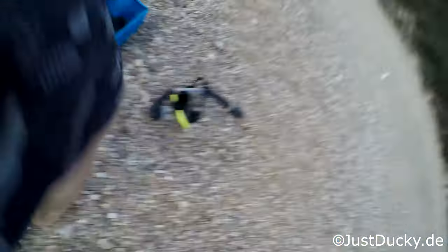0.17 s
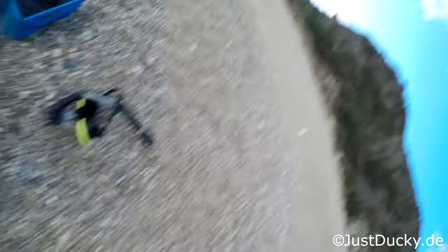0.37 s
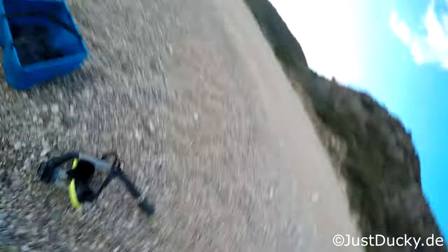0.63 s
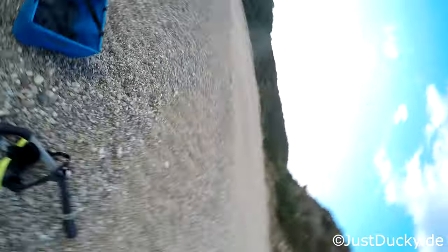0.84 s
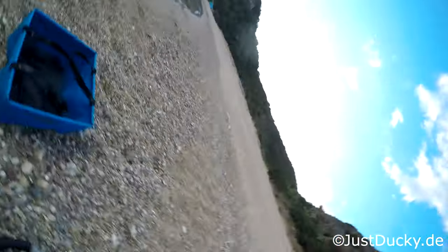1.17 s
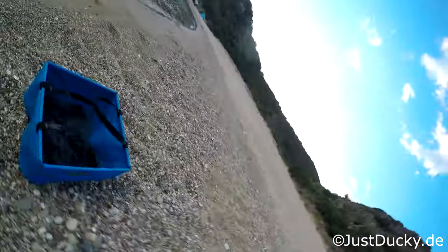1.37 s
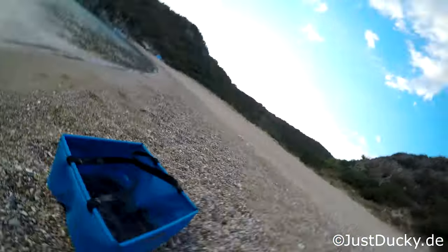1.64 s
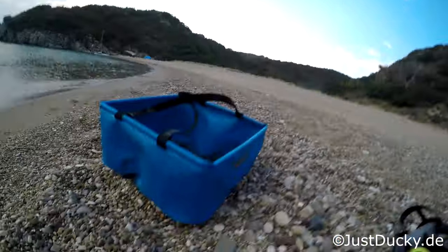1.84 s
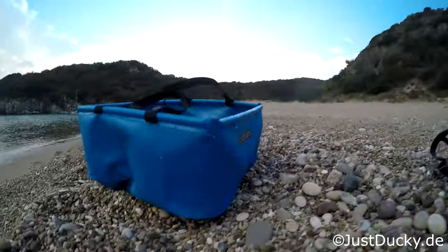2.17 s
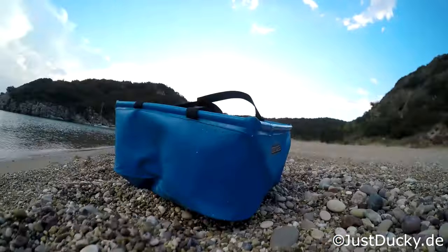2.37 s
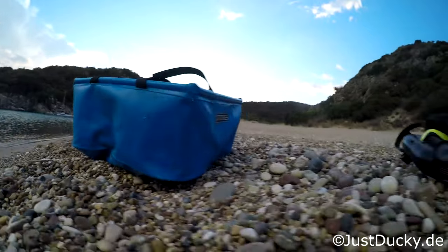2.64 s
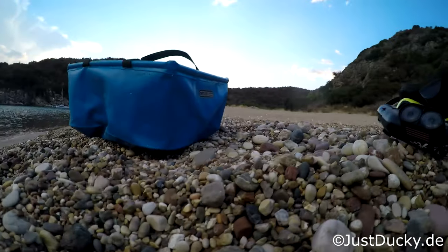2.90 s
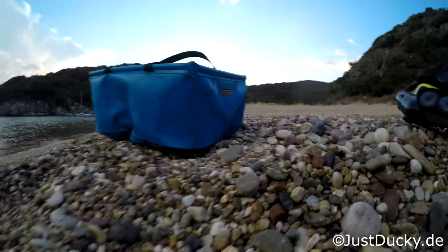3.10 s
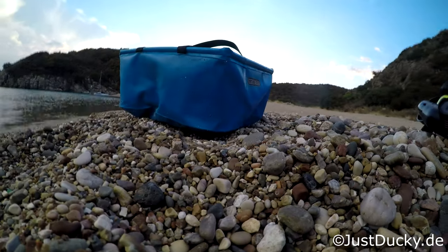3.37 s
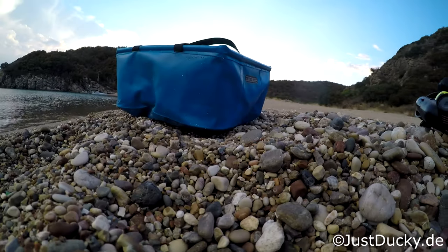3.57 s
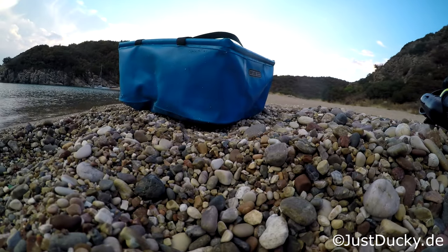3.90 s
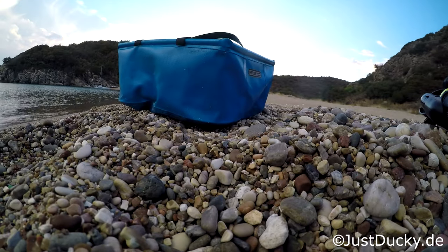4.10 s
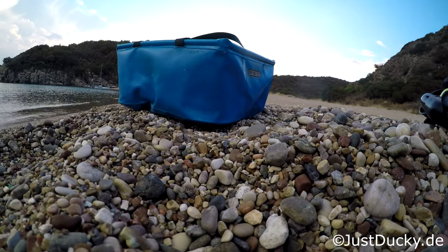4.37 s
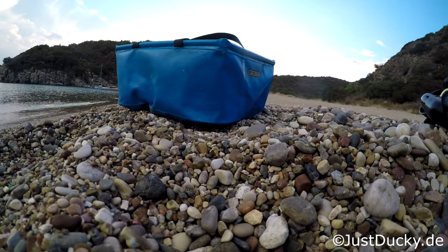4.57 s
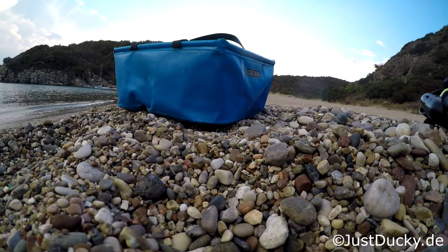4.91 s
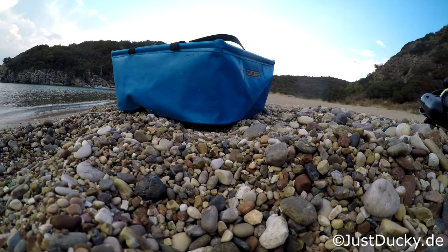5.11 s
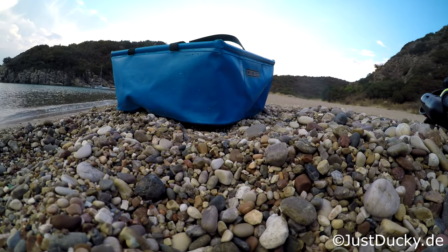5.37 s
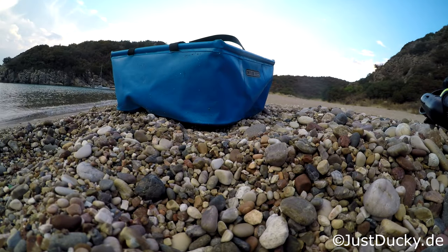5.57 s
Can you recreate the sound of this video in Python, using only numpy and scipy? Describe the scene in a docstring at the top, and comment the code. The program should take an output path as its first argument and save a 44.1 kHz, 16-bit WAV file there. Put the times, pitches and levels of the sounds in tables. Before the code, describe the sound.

A hand rubs and bumps a carried pole, then a plastic case crunches loudly into beach pebbles and settles to near silence with faint dull lapping.

```python
"""Pebbles knock and grind against a waterproof plastic case pushed into a beach, in a few shoves that settle.
Stone sounds are clumps of tiny ringing contacts, three-mode clacks and single damped knocks.
Before that the case is swung on a pole: skin friction is stick-slip grains, the pole a wavering low tone.
At rest, small waves lap dully: dense bubble grains over a noise boom. Thin hiss and quiet noise lie behind.
"""
import sys
import numpy as np
from scipy import signal
from scipy.fft import rfft, irfft, next_fast_len
from scipy.io import wavfile
from scipy.ndimage import uniform_filter1d

SR = 44100
rng = np.random.default_rng(int(sys.argv[2]) if len(sys.argv) > 2 else 0)


def materialize(psi):
    """Save the field psi as 16-bit PCM at rate SR to the path in sys.argv[1].

    A 1-D psi becomes a single channel; in a 2-D psi each row is a channel.
    """
    bounded = np.clip(np.atleast_2d(psi).T, -1, 1)
    quanta = np.round(bounded * 32767).astype(np.int16)
    wavfile.write(sys.argv[1], SR, quanta)


N = 253134  # samples

# shoves through the pebbles, then rocking and settling: start_s, hold_s, force_db, sharp_edges_re_force_db
SHOVES = [(2.454, 0.022, -31.5, -36), (2.505, 0.062, -16, -44), (2.583, 0.13, -15.5, -38),
          (2.743, 0.11, -15.5, -38), (2.876, 0.019, -14.5, -22), (2.907, 0.075, -24, -32),
          (2.98, 0.042, -22.5, -27), (3.03, 0.063, -30.5, -32), (3.106, 0.035, -21, -38),
          (3.145, 0.02, -14, -22), (3.189, .012, -14.5, -21), (3.208, 0.009, -21, -30),
          (3.254, 0.025, -21, -23), (3.287, 0.073, -33.5, -28), (3.395, 0.022, -25, -38),
          (3.461, 0.11, -47, -27), (3.54, 0.096, -48.5, -34), (3.67, 0.082, -41, -33),
          (3.704, 0.017, -34, -30), (3.797, 0.1, -60, -25), (3.97, .06, -74, -15), (4.144, 0.017, -53, -34),
          (4.235, 0.014, -53.5, -28), (4.345, 0.033, -57, -25), (4.396, 0.012, -51.5, -32),
          (4.474, 0.063, -47.5, -27), (4.564, 0.054, -58, -8)]
# spectrum of grinding stones: freq_hz, shape_db
CRUNCH_SPECTRUM = [(120, 19.5), (200, 9), (330, 0.5), (550, 1.5), (800, 3.5), (1100, 3.5), (1450, -2.5),
                   (2200, 2.5), (3000, -6), (3600, -16), (5200, -19), (6800, -28.5), (8500, -30),
                   (10300, -50), (12300, -35.5), (14000, -52.5), (16000, -58.5)]
# spectrum of the sharpest edges: freq_hz, shape_db
SPARKLE_SPECTRUM = [(6000, 7.5), (9000, -2.5), (10300, -11), (13000, -14.5), (16000, -32.5)]
# bass taken up as the case digs in: time_s, gain_db
BEDDING = [(2.75, -3), (3.2, 5)]
SHOVE_RISE_S, SHOVE_FALL_S = .04, 0.042   # per 20 dB
FULL_FORCE_DB, CRUNCH_DB = -14.5, -.5
WEIGHT_DB, WEIGHT_EXPONENT = -11.5, 0.8   # bass at full force; shrinks more slowly than the force
GRIT_DB, GRIT_EXPONENT = -11, 1.31   # treble at full force; shrinks faster
ZING_HZ, ZING_WIDTH_HZ, ZING_DB = 12300, 2100, -38.5   # thin ring of scratching edges, at full force
CLACK_SHARE, CLACKS_PER_S, CLACK_T60_AT_2KHZ_S = 0.54, 380, .024


def pebbles(force, load):
    """Gravel grinds and stones clack along the case: gritty when shoved hard, dull when it only rocks."""
    gravel = grains(per_s=2600, spread_db=3.0, clump_db=3, sharpness=7.4, tick=0.35)
    contacts = gravel + CLACK_SHARE * clacks(CLACKS_PER_S, CLACK_T60_AT_2KHZ_S)
    weight, crunch, grit = bands(case(colour(contacts, CRUNCH_SPECTRUM)), [125, 400, 3400, 7000])

    # few, sharp edges reach the top of the treble
    edges = grains(per_s=860, spread_db=6.0, clump_db=6.5, sharpness=10, tick=.5)
    scratches = edges + .5 * gravel
    sparkle, = bands(colour(scratches, SPARKLE_SPECTRUM), [7000, 16000])
    zing = resonate(resonate(scratches, ZING_HZ, ZING_WIDTH_HZ), ZING_HZ, ZING_WIDTH_HZ)
    zing = steady(zing, span_s=.05)

    sharp_rows = [(s, hold, db + edge_db) for s, hold, db, edge_db in SHOVES]
    treble = follow(force, GRIT_DB, GRIT_EXPONENT) * grit
    treble += follow(force, ZING_DB, GRIT_EXPONENT) * zing
    treble += strokes(sharp_rows, SHOVE_RISE_S, SHOVE_FALL_S) * sparkle
    bedding_db, = in_time(BEDDING)
    bass = load * from_db(bedding_db) * weight
    return from_db(CRUNCH_DB) * force * crunch + bass + treble


def follow(force, db, exponent):
    """A level that is db against the force at full force and goes with a power of it."""
    full = from_db(FULL_FORCE_DB)
    return full * from_db(db) * (force / full) ** exponent


CLACK_SPREAD_DB = 11   # most clacks are light, a few hard


def clacks(per_s, t60_at_2khz_s):
    """Larger stones clack at uneven gaps, each with three modes of its own; high modes die sooner."""
    start = SHOVES[0][0]
    end = SHOVES[-1][0] + SHOVES[-1][1]
    span = end - start
    out, t = np.zeros(N), np.arange(1500) / SR
    for when, size, *modes in rng.random((int(per_s * span), 5)):
        hz = 600 * 12 ** np.array(modes)[:, None]  # 600 to 7200 Hz
        decay = from_db(-60 * t / t60_at_2khz_s * np.sqrt(hz / 2000))
        ring = np.sqrt(hz) * np.sin(2 * np.pi * hz * t) * decay
        at = int((start + when * span) * SR)
        out[at:at + len(t)] += from_db(CLACK_SPREAD_DB * size ** 2) * ring.sum(axis=0)
    return rms_one(out) * np.sqrt(span * SR / N)  # unit power within the span


def grains(per_s, spread_db, clump_db, sharpness, tick):
    """Clumps of tiny contacts: each is a tick plus a brief ring at a pitch from a set of 22."""
    born = rng.random(N) < per_s * from_db(clump_db * drift(45)) / SR
    sizes = from_db(spread_db * np.minimum(rng.exponential(1, N), 4))
    clicks = born * sizes * rng.choice([-1, 1], N)
    pitches_hz = np.geomspace(400, 12000, 22)
    dealt = rng.integers(0, len(pitches_hz), N)
    rings = sum(resonate(clicks * (dealt == k), hz, hz / sharpness) for k, hz in enumerate(pitches_hz))
    return rms_one(rings + tick * clicks)


# hand and stones on the case: time_s, peak_db, pitch_hz, lowpass_hz (hardness), chatter_t60_s
KNOCKS = [(.242, -20, 2400, 6500, .02), (0.503, -21.5, 970, 4040, 0.016), (.633, -20, 1780, 3130, 0.021),
          (0.805, -17.5, 790, 7000, 0.021), (1.472, -12, 860, 2140, 0.089),
          (1.483, -16.5, 786, 1960, 0.064), (1.7738, -12, 1120, 2200, 0.034),
          (1.794, -20.5, 1200, 2800, .03), (1.808, -19.5, 1090, 3000, 0.032),
          (1.813, -13.5, 1080, 1800, 0.026), (1.842, -8.5, 1110, 3100, 0.05),
          (1.859, -6.5, 1100, 3000, 0.038), (1.8671, -1.5, 2200, 2700, 0.016),
          (1.982, -18, 2130, 3500, 0.066), (2.260, -40, 980, 3000, 0.034), (2.364, -30.5, 2996, 5000, .018),
          (2.428, -19.5, 2930, 3950, 0.013), (2.482, 8, 3100, 14000, 0.012),
          (2.484, -4.5, 1250, 3000, 0.06), (2.499, -2, 2300, 5444, 0.014), (2.505, -2.5, 2240, 5500, 0.014),
          (2.525, -6, 2480, 7000, .006), (2.549, -9, 1060, 5950, 0.015), (2.604, 1.5, 2100, 7060, 0.015),
          (2.71, -15, 3200, 4000, 0.019), (2.873, -2, 5000, 7980, 0.005), (2.880, 1.5, 1640, 2900, .025),
          (3.15, -11.5, 910, 7020, 0.025), (3.178, -1, 2030, 3610, .024), (3.182, 2, 2450, 4530, 0.014),
          (3.194, -11, 890, 7000, 0.013), (3.214, -8.5, 820, 5000, .018), (3.649, -31.5, 595, 2500, .025),
          (3.709, -25, 2206, 8000, 0.025), (3.764, -34, 2396, 5000, 0.012),
          (3.844, -41.5, 2400, 7000, 0.025), (3.965, -44, 500, 2960, 0.026), (4.043, -52, 400, 2500, .02),
          (4.077, -49, 2202, 2980, .02), (4.156, -41, 2300, 2800, 0.027), (4.161, -31.5, 600, 2380, 0.017),
          (4.246, -44.5, 900, 3000, .02), (4.346, -38, 1085, 2550, 0.071), (4.408, -33, 900, 1820, 0.028),
          (4.485, -35, 1200, 5000, 0.015), (4.551, -41, 2300, 4030, 0.014), (4.603, -39, 2310, 4500, 0.017),
          (5.134, -28, 3500, 7940, 0.013)]
# spectrum of a sharp blow: freq_hz, shape_db
BLOW_SPECTRUM = [(120, -29), (300, -11.5), (450, -3.5), (900, 8.5), (3000, 1.5), (5500, 3), (8000, -11),
                 (15000, -20.5)]
KNOCK_CHATTER = .36   # rattle after the first contact, as a share of it


def knocks():
    """A contact cracks, chatters for a moment and rings at its own pitch; soft ones lack treble."""
    out, t = np.zeros(N), np.arange(4096) / SR
    chatter = rng.standard_normal((len(KNOCKS), len(t)))
    for (s, peak_db, hz, top_hz, t60), rough in zip(KNOCKS, chatter):
        force = KNOCK_CHATTER * rough * from_db(-60 * t / max(t60, .002))
        force[0] += 1  # first contact
        softening = signal.butter(3, min(top_hz, .45 * SR), fs=SR, output="sos")
        force = signal.sosfilt(softening, force)
        hit = case(colour(resonate(force, hz, hz * 0.36) + 0.38 * force, BLOW_SPECTRUM))
        hit *= from_db(peak_db) / np.abs(hit).max()
        at = int(s * SR)
        out[at:at + len(t)] += hit[:N - at]
    return out


# case resonances: freq_hz, width_hz, lift_db
CASE_MODES = [(507, 70, 2.5), (827, 140, 5.5), (972, 26, 5), (2293, 210, 5.5), (3040, 81, 7), (4090, 75, 5),
              (5000, 490, 4.5), (9000, 1500, -7.5)]


def case(x):
    """The plastic case rings with whatever touches it."""
    return x + sum((from_db(db) - 1) * resonate(x, hz, width) for hz, width, db in CASE_MODES)


# spectrum of hand friction: freq_hz, shape_db
RUB_SPECTRUM = [(170, -12.5), (230, 8.5), (320, -10.5), (450, 1), (600, -7.5), (800, 0), (1000, 1),
                (1400, -6.5), (1800, -1), (2300, -2), (3000, -7), (3600, -19), (5000, -25.5), (7000, -39),
                (9000, -43.5)]
PALM_DB, SKIN_DB, SCRAPE_DB = -1.5, -3.5, -4   # low, middle and high part of the friction


def grip(rubbing, rasping, pressing):
    """Skin and strap stick and slip on the pole in fine, dense jerks."""
    slips = grains(per_s=4000, spread_db=-1.5, clump_db=3, sharpness=8.3, tick=0.27)
    palm, skin, scrape = bands(case(colour(slips, RUB_SPECTRUM)), [190, 650, 1500, 9000])
    out = pressing * from_db(PALM_DB) * palm
    out += rubbing * from_db(SKIN_DB) * skin
    return out + rasping * from_db(SCRAPE_DB) * scrape


# hand shifts on the pole, before part levels: start_s, hold_s, rub_db, palm_press_db, rasp_re_rub_db
RUBS = [(0, .14, -37.5, -51.5, 3.5), (0.167, 0.044, -52, -46, 10), (0.393, .04, -40, -54, -2.5),
        (0.447, 0.044, -35, -46.5, 4), (.503, 0.014, -34, -34, 5.5), (0.635, 0.04, -22, -34.5, 0),
        (0.685, 0.046, -19, -35, 0), (0.754, 0.038, -28, -46, -2), (0.795, 0.024, -27.5, -31, 5.5),
        (0.832, 0.06, -35, -41.5, 3.5), (0.899, 0.076, -32, -34.5, 2.5), (0.993, .055, -41.5, -35.5, 2),
        (1.094, 0.12, -60, -42.5, -3), (1.431, .04, -35.5, -59, -3), (1.463, 0.036, -29, -30.5, -4.5),
        (1.551, 0.022, -34, -53, 0.5), (1.697, 0.18, -34, -39.5, -6), (1.881, 0.046, -40.5, -50, 6),
        (1.975, 0.046, -33, -51, 0.5), (2.025, 0.061, -39, -57, 2), (2.097, 0.091, -47.5, -59, -5),
        (2.265, 0.021, -38.5, -51, -2), (2.417, 0.0099, -50, -58, 6)]
RUB_RISE_S, RUB_FALL_S = .022, 0.023   # per 20 dB
HOLD_RUB_DB, HOLD_PALM_DB = -49, -56.5   # the hand creeps while it carries the pole
TOUCHDOWN_S, AT_REST_S = 2.45, 3.5   # the case meets the stones; it stops ploughing


def hand_effort():
    """How hard the hand rubs, rasps and presses, as three envelopes."""
    creep = (0, TOUCHDOWN_S, HOLD_RUB_DB, HOLD_PALM_DB, 0.0026)
    s, hold, rub_db, press_db, rasp_db = np.transpose(RUBS + [creep])
    levels = (rub_db, rub_db + rasp_db, press_db)
    return [strokes(zip(s, hold, db), RUB_RISE_S, RUB_FALL_S) for db in levels]


# grip squeaks: time_s, peak_db, pitch_hz, half_width_s (to 1/e)
SQUEAKS = [(1.881, -26.5, 2100, 0.011), (1.885, -23, 2250, 0.0026), (1.892, -30, 2600, 0.0026),
           (1.9, -34, 2400, 0.011), (1.918, -22, 2100, 0.0015)]


def squeaks():
    """Short slips sing at a wavering pitch."""
    cycles = np.cumsum(1 + 0.075 * drift(186)) / SR
    return sum(from_db(peak_db) * swell(s, length) * np.sin(2 * np.pi * hz * cycles)
               for s, peak_db, hz, length in SQUEAKS)


# shaking by the arm: time_s, pole_flex_db, slow_sway_db (sway before a 1.5 dB cut)
SHAKE = [(0, -29, -28), (.4, -35.5, -22), (.6, -24.5, -22), (.92, -20, -19.5), (1.18, -24, -28.5),
         (1.35, -42.5, -23), (1.5, -26, -19.5), (1.64, -28.5, -34), (1.75, -23.5, -23), (2.4, -31.5, -28),
         (2.5, -13, -17.5), (2.97, -27.5, -21.5), (3.44, -36, -22.5), (3.6, -41, -45), (4.03, -54, -60.5),
         (4.47, -37.5, -44), (4.65, -68, -60), (5.74, -32, -46)]
# jolts of the rig by footfalls, touchdown, stones giving way: time_s, peak_db, pitch_hz, half_width_s (to 1/e)
JOLTS = [(.18, -29, 146, 0.027), (0.31, -23, 30.6, 0.029), (0.52, -7.5, 45.3, 0.019),
         (0.647, -5, 89, 0.028), (.685, -9, 98, 0.018), (1.496, -7.5, 26, 0.044), (2.212, -10, 50, 0.01),
         (2.465, -3, 45.4, 0.014), (3.19, -7.5, 100, 0.011), (3.22, -11.5, 182, 0.0083),
         (3.276, -16.5, 130, .012), (4.169, -28.5, 68.3, 0.024), (4.17, -42.5, 236.6, .012),
         (4.365, -42.5, 238, 0.011), (4.459, -31, 61.2, 0.068)]
# spectrum of the pole's loose shudder: freq_hz, shape_db
SHUDDER_SPECTRUM = [(50, -30.5), (90, 12.5), (130, 0), (165, -4), (220, -19), (300, -26.5), (600, -57)]
# spectrum of the arm's sway: freq_hz, shape_db
SWAY_SPECTRUM = [(12, 8.5), (25, 4), (48, 12.5), (70, -1.5), (130, -26.5), (300, -40), (600, -92)]
PALM_TO_POLE_DB, STONES_TO_POLE_DB, WAVES_TO_POLE_DB = 16, 10.5, -1.5
POLE_CARRIED_HZ, POLE_PLOUGHING_HZ, POLE_RESTING_HZ = 99.4, 84.3, 65   # mean bending note; stones load it down
POLE_GLIDE_S, SHUDDER_DB = 0.17, -7.5


def pole(pressing, load, surge):
    """Arm, palm, stones and surf set the pole flexing about its bending note; the arm also sways and jolts it."""
    t = np.arange(N) / SR
    flex_db, sway_db = in_time(SHAKE)
    drives = [from_db(flex_db), from_db(PALM_TO_POLE_DB) * pressing,
              from_db(STONES_TO_POLE_DB) * load, from_db(WAVES_TO_POLE_DB) * surge]
    hz = np.interp(t, [TOUCHDOWN_S - POLE_GLIDE_S, TOUCHDOWN_S, AT_REST_S - POLE_GLIDE_S, AT_REST_S],
                   [POLE_CARRIED_HZ, POLE_PLOUGHING_HZ, POLE_PLOUGHING_HZ, POLE_RESTING_HZ])
    phase = 2 * np.pi * np.cumsum(hz * (1 + 0.087 * drift(30))) / SR
    flex = rms_one(np.sin(phase) * from_db(2.5 * drift(26)))
    flex = steady(flex + from_db(SHUDDER_DB) * noise(SHUDDER_SPECTRUM), span_s=0.13)
    out = np.linalg.norm(drives, axis=0) * flex  # drive powers add
    out += from_db(sway_db - 1.5) * steady(noise(SWAY_SPECTRUM), span_s=0.19)
    for s, peak_db, jolt_hz, length in JOLTS:
        out += from_db(peak_db) * swell(s, length) * np.cos(2 * np.pi * jolt_hz * (t - s))
    return out


# wavelets running up the shore: start_s, hold_s, level_db
WAVES = [(4.87, 0.034, -37.5), (5.04, 0.085, -35.5), (5.16, 0.24, -46), (5.498, 0.012, -36.5),
         (5.575, 0.1, -36)]
# spectrum of the wash through the case: freq_hz, shape_db
WASH_SPECTRUM = [(160, -16.5), (280, 9), (423, -4.5), (522, 1.5), (584, -5), (737, 0.5), (871, -5.5),
                 (1100, -19.5), (1740, -29.5), (1860, -33.5), (2240, -23), (2680, -34.5), (4000, -32),
                 (5200, -52), (8800, -120)]
# spectrum of the hollow boom: freq_hz, shape_db
BOOM_SPECTRUM = [(90, -31), (130, -4), (165, 8.5), (205, 5.5), (270, -8.5), (400, -56)]
WAVE_RISE_S, WAVE_FALL_S = 0.068, 0.13   # per 20 dB
LAPPING_FROM_S, LAPPING_DB, BOOM_DB = 4.5, -49.5, 5.5   # slop between wavelets; boom against the wash
BUBBLES_PER_S = 3500


def waves(surge):
    """Wavelets slop on the shore as dense bubbles, muffled by the case, over a hollow boom."""
    bubbles = grains(per_s=BUBBLES_PER_S, spread_db=0.5, clump_db=1.5, sharpness=10.4, tick=0.04)
    wash = steady(colour(bubbles, WASH_SPECTRUM), span_s=0.09)
    boom = steady(noise(BOOM_SPECTRUM), span_s=0.072)
    return surge * (wash + from_db(BOOM_DB) * boom)


# wavelets slapping the shore: time_s, peak_db, pitch_hz, gurgle_t60_s
SLAPS = [(4.833, -33.5, 786, 0.072), (4.868, -30, 510, 0.082), (5.045, -26, 684, 0.058),
         (5.497, -31, 740, 0.034), (5.596, -33, 545, 0.053)]


def slaps():
    """A wavelet's front slaps a hollow between the stones and gurgles away: decaying noise, resonated."""
    out, t = np.zeros(N), np.arange(4096) / SR
    for s, peak_db, hz, t60 in SLAPS:
        gurgle = rng.standard_normal(len(t)) * from_db(-60 * t / t60)
        slap = resonate(resonate(gurgle, hz, 0.22 * hz), hz, 0.24 * hz)
        at = int(s * SR)
        out[at:at + len(t)] += from_db(peak_db) * slap[:N - at] / np.abs(slap).max()
    return out


# swells of thin hiss, before flicker: start_s, hold_s, level_db
HISSES = [(0, .11, -44.5), (.39, .06, -44), (.5, 0.21, -52), (.8, 0.14, -60.5), (.98, 1, -56.5),
          (1.62, 0.17, -44), (1.85, 0.047, -64), (2, 0.12, -61.5), (2.15, .3, -66.5), (4.58, 0.16, -61),
          (4.85, 0.036, -60.5), (5.02, 0.035, -54), (5.22, 0.047, -54), (5.44, 0.051, -54),
          (5.55, 0.13, -61.5)]
# faint whistles in the hiss: middle_s, half_width_s (to 1/e), pitch_hz, width_hz (per resonance), level_db
WHISTLES = [(0.47, 0.14, 10200, 600, -55), (1.1, 0.2, 10300, 600, -60.5), (1.6, .2, 9800, 980, -60),
            (1.45, 0.47, 5580, 650, -58.5), (1.7, .16, 13600, 2200, -52)]
# spectrum of the thin hiss: freq_hz, shape_db
HISS_SPECTRUM = [(600, -19.5), (1500, 3.5), (3000, 7.5), (4800, 7.5), (5700, 6.5), (7300, 5), (8200, -1.5),
                 (9300, 1), (11000, 1.5), (13500, 0.5), (15500, -6.5)]
# spectrum of the quiet beach: freq_hz, shape_db
STILL_SPECTRUM = [(24, -32), (40, -1.5), (73, -19.5), (119, -21), (186, 3), (329, -16), (478, -9),
                  (910, -22), (1420, -32.5), (2280, -37), (3560, -38.5), (12300, -48), (15000, -83.5)]
HISS_RISE_S, HISS_FALL_S = .16, .17   # per 20 dB
STILL_DB = -56.5


def air():
    """A thin flickering hiss with passing narrowband whistles, over the quiet of the beach."""
    flicker = from_db(2.5 * drift(25))
    out = strokes(HISSES, HISS_RISE_S, HISS_FALL_S) * flicker * noise(HISS_SPECTRUM)
    out += from_db(STILL_DB) * noise(STILL_SPECTRUM)
    for s, length, hz, width, db in WHISTLES:
        whistle = resonate(resonate(rng.standard_normal(N), hz, width), hz, width)
        out += from_db(db) * swell(s, length) * rms_one(whistle)
    return out


def from_db(db):
    """Decibels to gain."""
    return 10 ** (np.asarray(db) / 20)


def rms_one(x):
    """Scale to unit power."""
    return x / np.sqrt(np.mean(x ** 2) + 1e-20)


def in_time(rows):
    """Each column of a curve at every sample."""
    s, *columns = np.transpose(rows)
    return [np.interp(np.arange(N) / SR, s, c) for c in columns]


def swell(s, length):
    """A bell-shaped rise and fall around a moment; length is the half width to 1/e."""
    return np.exp(-np.minimum(((np.arange(N) / SR - s) / length) ** 2, 30))


def strokes(rows, rise_s, fall_s):
    """Envelope of (start_s, hold_s, level_db) events: each swells, holds and fades; their powers add."""
    t, power = np.arange(0, N, 16) / SR, 1e-14
    for start, hold, db in rows:
        away = np.maximum(start - t, 0) / rise_s + np.maximum(t - start - hold, 0) / fall_s
        power = power + from_db(db - 20 * np.minimum(away, 10)) ** 2
    return np.interp(np.arange(N) / SR, t, np.sqrt(power))


def drift(rate_hz):
    """Slow chance with spread one: low-passed noise."""
    step = 40  # computed at every 40th sample
    r = np.exp(-2 * step * np.pi * rate_hz / SR)
    slow = signal.lfilter([1], [1, -2 * r, r * r], rng.standard_normal(N // step + 2002))[2000:]
    return np.interp(np.arange(N) / step, np.arange(len(slow)), rms_one(slow))


def steady(x, span_s):
    """Even out the level over spans longer than span_s."""
    return x / np.sqrt(np.abs(uniform_filter1d(x * x, max(int(span_s * SR), 8))) + 1e-12)


def bands(x, edges_hz):
    """Split at the edges; each band is evened to unit level."""
    out = []
    for low, high in zip(edges_hz, edges_hz[1:]):
        sos = signal.butter(4, [low, min(high, .45 * SR)], "band", fs=SR, output="sos")
        out.append(steady(signal.sosfilt(sos, x), span_s=0.036))
    return out


def resonate(x, hz, width_hz):
    """A two-pole resonance with gain one on top."""
    r = np.exp(-np.pi * width_hz / SR)
    zeros = np.array([1, 0, -1]) * (1 - r * r) / 2
    poles = [1, -2 * r * np.cos(2 * np.pi * hz / SR), r * r]
    return signal.lfilter(zeros, poles, x + 1e-18)


def colour(x, points):
    """Causal (minimum-phase) filter that follows a spectrum, by folding its cepstrum."""
    n = 2 * next_fast_len(len(x) // 2 + 4096)
    hz, db = np.transpose(points)
    f = np.maximum(np.arange(n // 2 + 1) * SR / n, 1)
    cepstrum = irfft(np.log(from_db(np.interp(np.log(f), np.log(hz), db))))
    cepstrum[1:n // 2] *= 2
    cepstrum[n // 2 + 1:] = 0
    return irfft(rfft(x, n) * np.exp(rfft(cepstrum)))[:len(x)]


def noise(points):
    """Coloured noise of unit power."""
    return rms_one(colour(rng.standard_normal(N), points))


def scene():
    """Stones, hand and surf each make their own sound and shake the pole; one microphone in the case hears all."""
    force = strokes([row[:3] for row in SHOVES], SHOVE_RISE_S, SHOVE_FALL_S)
    load = follow(force, WEIGHT_DB, WEIGHT_EXPONENT)
    rubbing, rasping, pressing = hand_effort()
    lapping = (LAPPING_FROM_S, N / SR, LAPPING_DB)
    surge = strokes(WAVES + [lapping], WAVE_RISE_S, WAVE_FALL_S)
    stones = pebbles(force, load) + knocks()
    handling = grip(rubbing, rasping, pressing) + squeaks() + pole(pressing, load, surge)
    shore = waves(surge) + slaps()
    return (stones + handling + shore + air())[None]


CUTOFF_HZ = 15800


def record(dry):
    """The loudest peaks flatten; the top is cut."""
    rounded = dry / (1 + dry ** 8) ** (1 / 8)
    return signal.sosfilt(signal.ellip(10, .1, 80, CUTOFF_HZ, fs=SR, output="sos"), rounded)


dry = scene()
out = record(dry)
materialize(out)
```